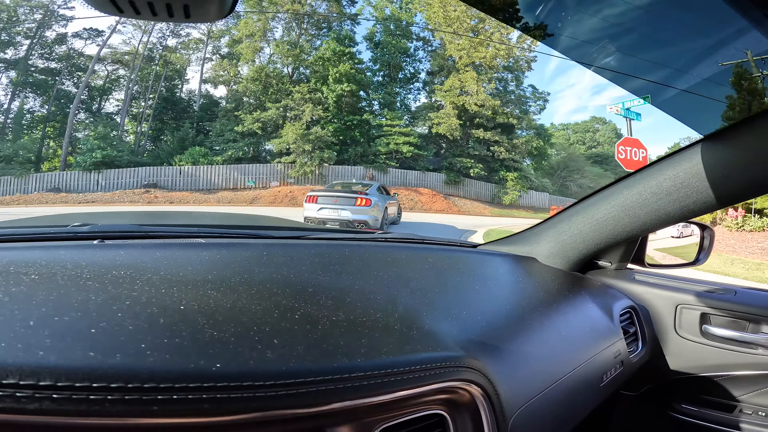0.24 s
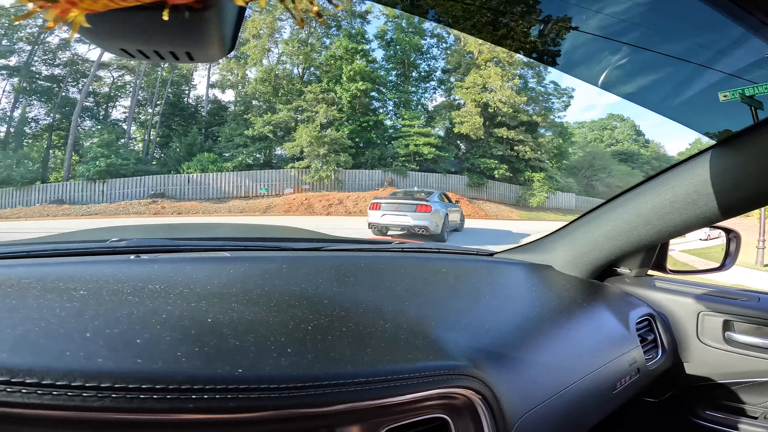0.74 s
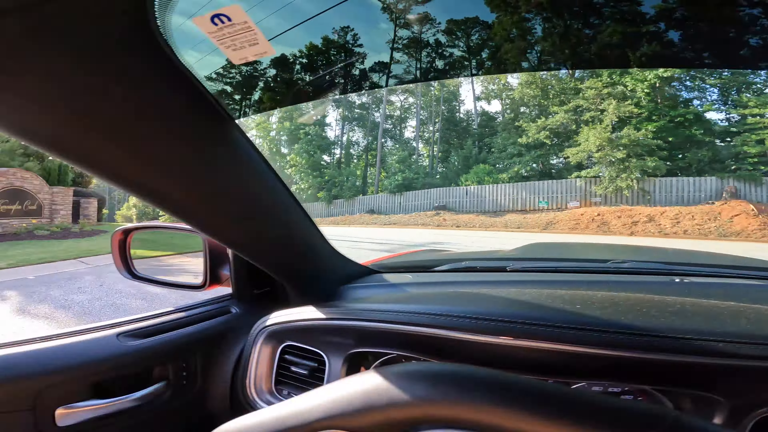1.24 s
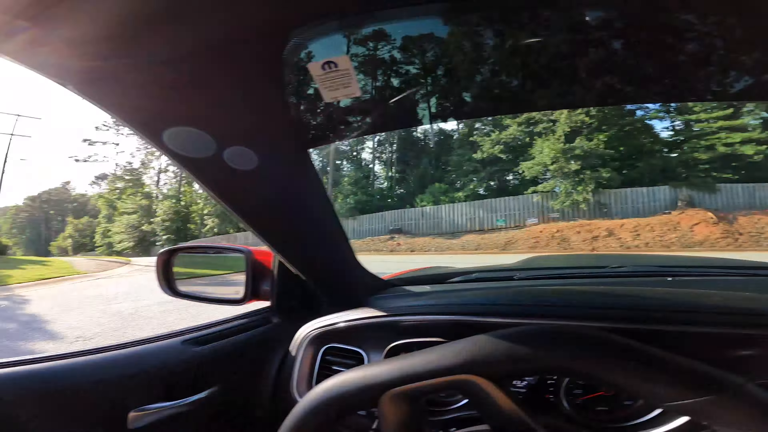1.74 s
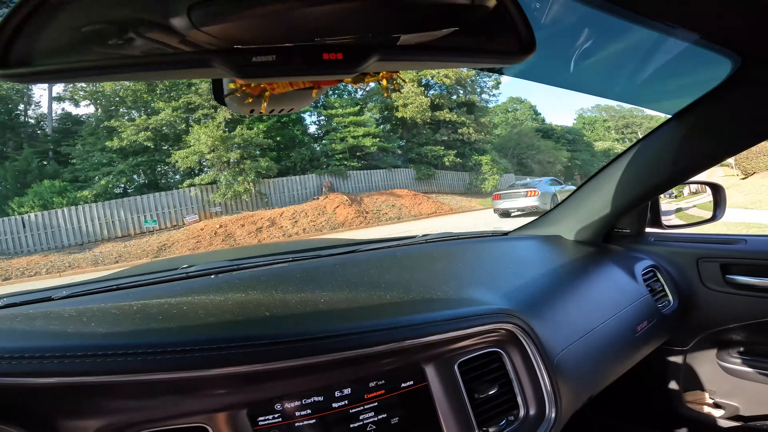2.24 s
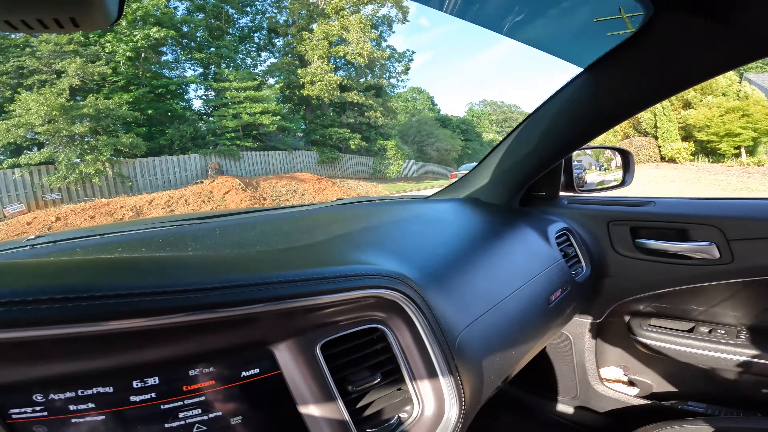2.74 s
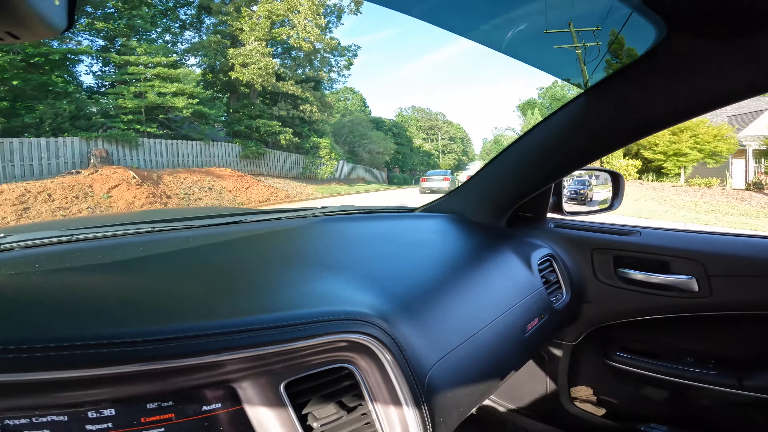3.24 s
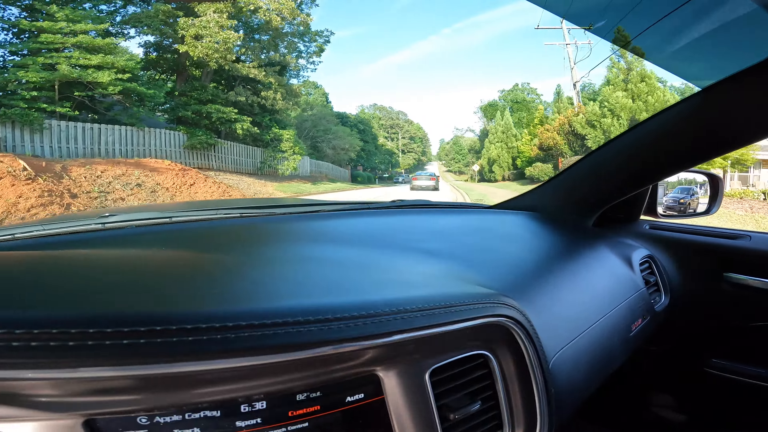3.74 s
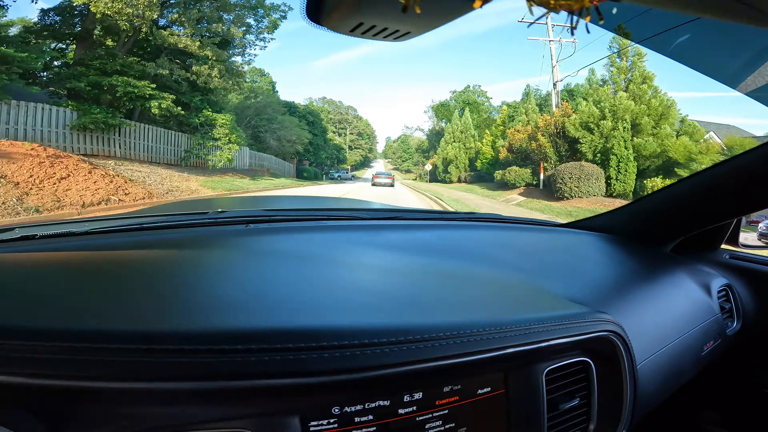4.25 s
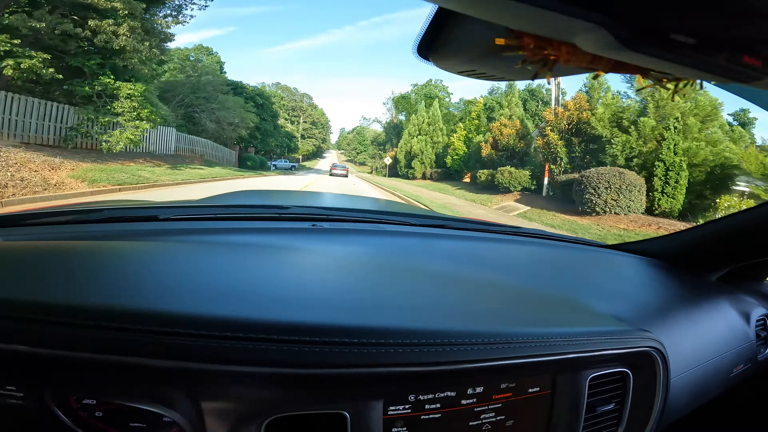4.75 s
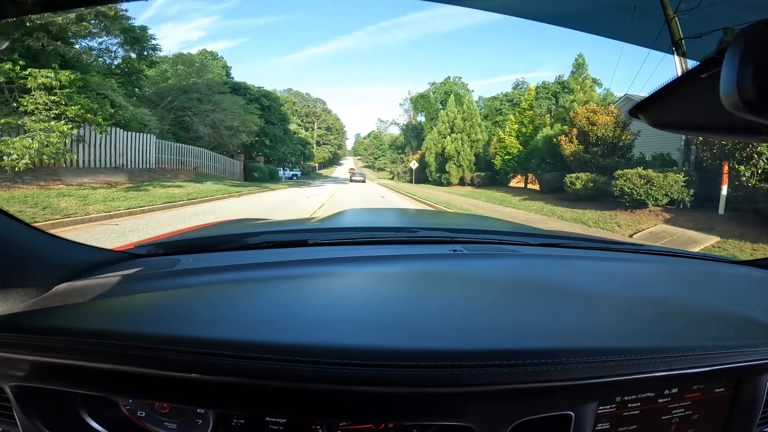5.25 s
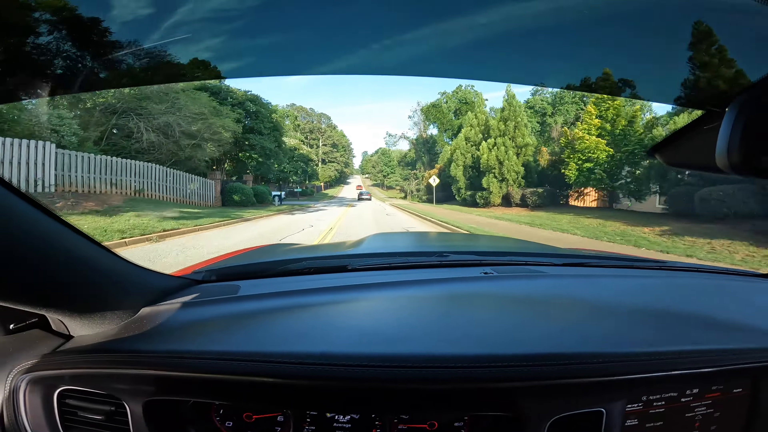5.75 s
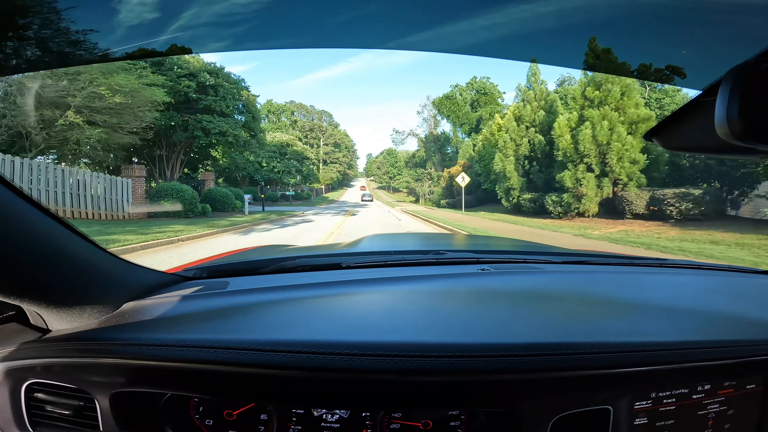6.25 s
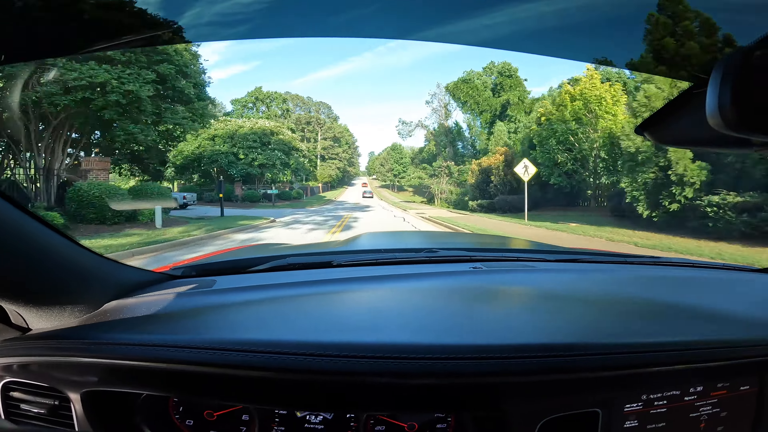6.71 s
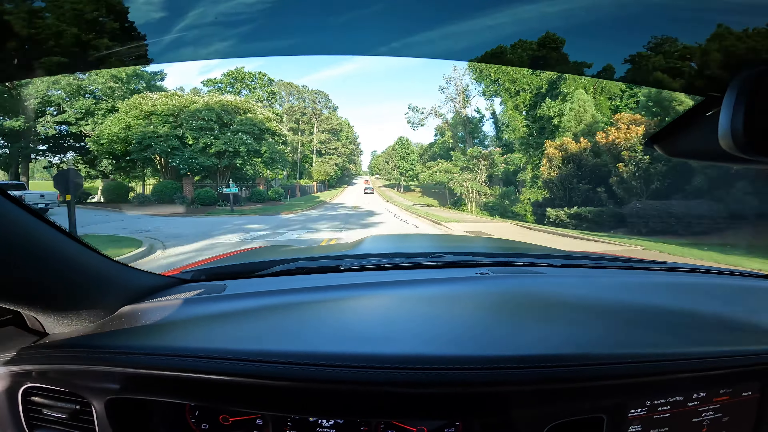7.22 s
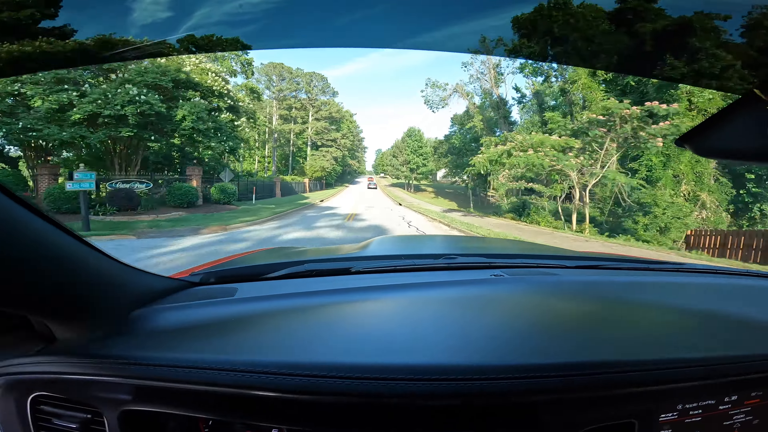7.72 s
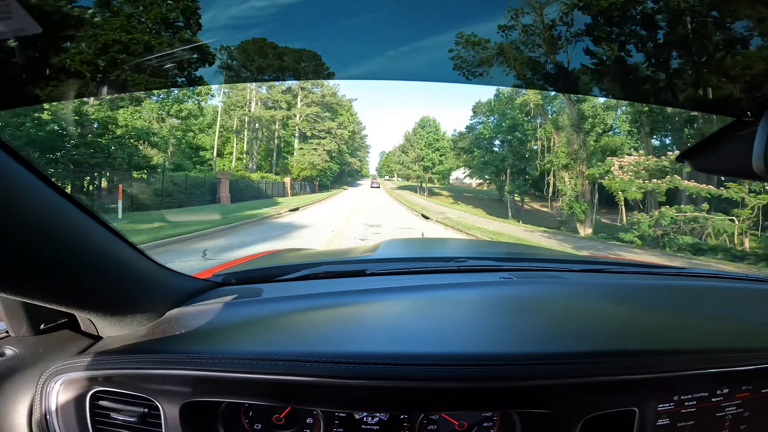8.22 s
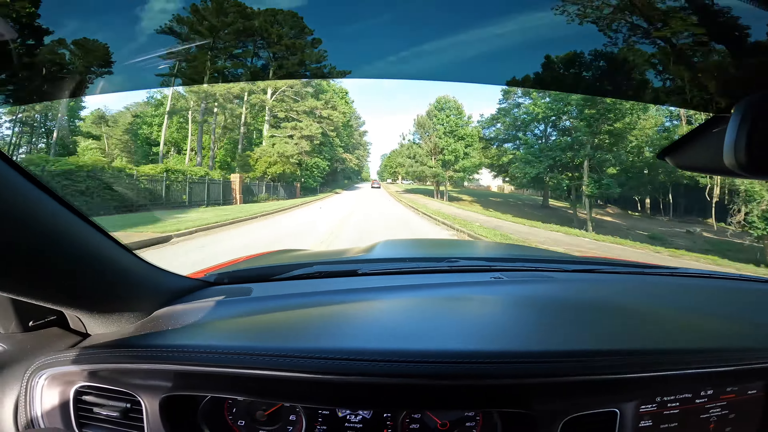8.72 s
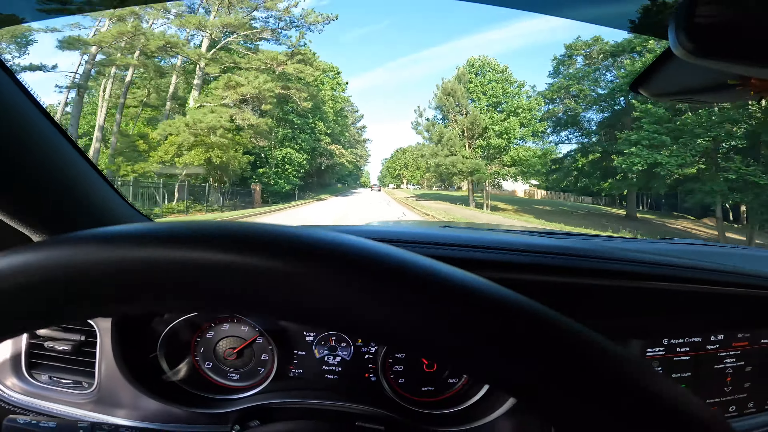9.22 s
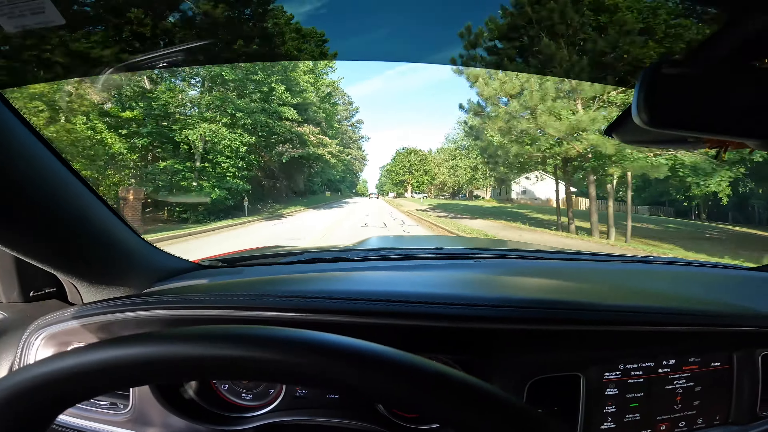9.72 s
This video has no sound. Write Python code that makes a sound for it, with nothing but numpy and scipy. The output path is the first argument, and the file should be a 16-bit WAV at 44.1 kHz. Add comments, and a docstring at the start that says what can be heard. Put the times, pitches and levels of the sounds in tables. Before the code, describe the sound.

A microphone carried about inside a moving car catches another V8 pulling away in front, its exhaust growling and snarling through gear changes, tyres chirping and howling. As it recedes, the near engine rises from a soft idle hum to a full-throttle roar with airy hiss, changes up twice, and relaxes over bumpy low road rumble.

```python
"""A V8 car ahead revs away with howling tyres, heard from inside a second V8 car that follows it. The near
engine then pulls from low revs, kicks down, shifts up twice and eases into a cruise. Firing pulses and puffs of
noise make the exhausts; wavering sines make the engine notes and booms. Shaped noise makes the road rumble, the
rushing air and a few gritty ticks; gliding tones make the tyres and one high engine whine of the car ahead."""
import sys
import numpy as np
from scipy import signal
from scipy.fft import rfft, irfft, next_fast_len
from scipy.io import wavfile
from scipy.ndimage import uniform_filter1d

SR = 44100
rng = np.random.default_rng(int(sys.argv[2]) if len(sys.argv) > 2 else 0)


def waveform_to_disk(signal):
    """Save audio, clipped to [-1, 1], as 16-bit WAV at the path in sys.argv[1]."""
    frames = np.transpose(np.atleast_2d(signal))
    scaled = np.clip(frames, -1, 1) * 32767
    samples = np.round(scaled).astype(np.int16)
    wavfile.write(sys.argv[1], SR, samples)


N = 439677


def from_db(db):
    """Turns decibels into a gain."""
    return 10 ** (np.asarray(db) / 20)


def rms_one(x):
    """Scales x to an average strength (rms) of 1."""
    return x / np.sqrt(np.mean(x ** 2) + 1e-20)


def follow(rows, control):
    """Reads each column of a table at the control's value, with straight lines between rows."""
    x, *columns = np.transpose(rows)
    return [np.interp(control, x, column) for column in columns]


def in_time(rows):
    """Turns a table whose first column is time into one curve per remaining column."""
    return follow(rows, np.arange(N) / SR)


def sounding(rows, fade_s):
    """Is 1 during a table's time span and fades to 0 outside it."""
    t = np.arange(N) / SR
    inside_s = np.minimum(t - rows[0][0], rows[-1][0] - t)
    return np.clip(1 + inside_s / fade_s, 0, 1)


def swell(start, end, attack_s, release_s):
    """Rises smoothly, holds and falls: 0-1, half-way up at start and half-way down at end."""
    t = np.arange(N) / SR
    rise = .5 + .5 * np.tanh(2 * (t - start) / attack_s)
    fall = .5 + .5 * np.tanh(2 * (end - t) / release_s)
    return rise * fall


def swells(rows, fade_s):
    """Sums events (start, end, values..) into one curve per value."""
    return sum(np.outer(values, swell(start, end, fade_s, fade_s)) for start, end, *values in rows)


def drift(rate):
    """Wanders smoothly at random with spread 1; a higher rate wanders faster."""
    step = 40  # samples between the points of the slow curve
    r = np.exp(-2 * step * np.pi * rate / SR)
    raw = rng.standard_normal(N // step + 2002)
    slow = signal.lfilter([1], [1, -2 * r, r * r], raw)[2000:]  # drops the filter's start-up
    return np.interp(np.arange(N) / step, np.arange(len(slow)), rms_one(slow))


def noise():
    """Makes fresh white noise."""
    return rng.standard_normal(N)


def colour(x, spectrum):
    """Filters x to the drawn response, then scales it to rms 1."""
    hz, db = np.transpose(spectrum)
    size = next_fast_len(N + SR // 10)
    f = np.maximum(np.fft.rfftfreq(size, 1 / SR), 1)
    gain = from_db(np.interp(np.log(f), np.log(hz), db, left=-90, right=-90))
    return rms_one(irfft(rfft(x, size) * gain, size)[:N])


def even(x):
    """Holds the slow level near 1 and keeps the fast throb."""
    slow_power = np.abs(uniform_filter1d(x ** 2, SR // 8))
    return x / np.sqrt(slow_power + 1e-9)


# Road rumble as the car gathers speed: t/s, level/dB (before bumps and trim)
RUMBLE_LEVEL = [(0, -22.5), (3.9, -24.5), (4.6, -22.5), (9.97, -19)]
# Rough stretches of road: start t/s, end t/s, added level/dB
BUMPS = [(4.66, 4.9, 8), (5.4, 5.8, 6.5), (5.85, 6.14, 10), (6.48, 6.85, 9.5), (7.42, 8.2, 5),
         (8.85, 9.5, 8)]
# Tone of the rumble: f/Hz, relative level/dB
RUMBLE_SPECTRUM = [(11, -18.5), (20, 5), (29, 0), (42, -4), (62, -7.5), (85, -22), (130, -28), (250, -37)]
# Tone of the cabin's low resonances: f/Hz, relative level/dB
CABIN_DRONE = [(60, -12.5), (90, -5.5), (115, -1.5), (160, -3), (220, -7), (290, -8.5), (450, -25)]


def road():
    """Buffeting and tyre rumble are low noise, joined by noise at the cabin's own low resonances."""
    rumble_db = in_time(RUMBLE_LEVEL)[0] + swells(BUMPS, fade_s=0.15)[0] + 0.67 * drift(1.3)
    rumble = from_db(rumble_db - 5.5) * even(colour(noise(), RUMBLE_SPECTRUM))
    drone = from_db(-26.5 + 1.1 * drift(3.9)) * colour(noise(), CABIN_DRONE)
    return rumble + drone


# Gritty ticks: t/s, strength level/dB (before trim and colouring)
TICKS = [(0.3501, -30), (0.391, -30), (0.4674, -36), (0.5124, -37), (0.7743, -33), (2.1994, -48),
         (2.4144, -38), (2.4674, -39), (2.7514, -32), (2.7945, -36), (2.8214, -37), (2.8844, -35),
         (2.9894, -33), (3.0344, -38), (3.1058, -37)]


def grit(decay_s, level_db):
    """Each tick is a short, dying spray of tiny noise grains of uneven strength."""
    hits = np.zeros(N)
    for s, db in TICKS:
        hits[round(s * SR)] = from_db(db + level_db)
    spray = signal.lfilter([1], [1, -np.exp(-1 / (decay_s * SR))], hits + 1e-18)
    grains = noise() * from_db(4 * noise())
    # f/Hz, relative level/dB
    spectrum = [(2000, -7), (5500, 6.5), (8500, -6.5), (11300, -15), (13000, -12), (15500, -24)]
    return spray * colour(grains, spectrum)


def air(hiss_db, spectrum):
    """Rushing air is noise that flutters around the level an engine sets."""
    flutter_db = .8 * drift(40)
    return from_db(hiss_db - .5 + flutter_db) * colour(noise(), spectrum)


def cabin(x, wet):
    """Adds quick cabin reflections, whose mix shifts as the listening spot is carried about."""
    t60_s = 0.16  # time for reflections to die by 60 dB
    t = np.arange(SR // 20) / SR
    dying = from_db(-60 * t / t60_s)
    reflections = 0
    for _ in range(3):
        path = signal.oaconvolve(x, rng.standard_normal(len(t)) * dying)[:N]
        reflections = reflections + drift(1.48) * path
    return rms_one(x) + wet * rms_one(reflections)


# Engine speeds count four-stroke cycles (two crank turns); a V8 fires eight times a cycle.
# Engine order k is a tone at k times the cycles per second.
def crank(speed, flutter):
    """Counts the engine cycles turned so far, at a slightly unsteady speed."""
    return np.cumsum(speed * (1 + flutter * drift(9))) / SR


def boom(turns, orders, waver):
    """Low engine orders are sines locked to the turning engine; each wavers in strength."""
    total = 0
    for order, db in orders:
        strength = np.sqrt(2) * from_db(db) * (1 + waver * drift(20))
        total = total + strength * np.sin(2 * np.pi * (round(order) * turns + rng.random()))
    return total


def blare(turns, blares, waver):
    """Single engine orders swell as they meet a tailpipe resonance, then sink back."""
    fade_s = 0.14
    return sum(swell(start, end, fade_s, fade_s) * boom(turns, [(order, db)], waver)
               for start, end, order, db in blares)


# Cylinders in firing order: strength level/dB, lateness at the tailpipe/share of the firing gap
CYLINDERS = [(-2, -0.0048), (-6, 0.258), (-9, 0.051), (0, -0.129), (1, 0.2966), (-8, -0.046), (-7, 0.173),
             (-4.5, 0.346)]


def firings(turns, rough, jitter_s):
    """Each cylinder sends one pulse; the two banks arrive unevenly, which gives the V8 burble."""
    strength_db, late = np.transpose(CYLINDERS)
    count = np.arange(int(turns[-1] * len(late)) - 1)
    cylinder = count % len(late)
    at = np.interp((count + late[cylinder]) / len(late), turns, np.arange(N)).astype(int)
    time_luck, strength_luck = rng.standard_normal((N // 100, 2))[:len(at)].T
    # no two charges burn alike: the spread in timing blurs the highest orders
    at = np.clip(at + jitter_s * SR * time_luck, 0, N - 1).astype(int)
    pulses = np.zeros(N)
    pulses[at] = from_db(strength_db[cylinder]) * (1 + rough[at] * strength_luck)
    return pulses


# Tone of the treble rasp of both exhausts: f/Hz, relative level/dB
RASP = [(1500, -18.5), (2000, -6), (2500, -2), (3100, -3), (3900, -10.5), (5000, -16), (6000, -21.5),
        (7500, -44.5)]
# Share of gas noise in growl and bark, per unit of firing roughness
GAS_IN_GROWL, GAS_IN_BARK = 1.4, 2.3


def exhaust(turns, levels_db, rough, growl, bark, gas_rasp):
    """Each firing is a pressure pulse and a dying puff of gas noise, which takes over towards the treble."""
    growl_db, bark_db, rasp_db = levels_db
    puff_s = 0.038
    pulses = firings(turns, rough, jitter_s=.00008)
    puff = signal.lfilter([1], [1, -np.exp(-1 / (puff_s * SR))], np.abs(pulses))
    tone = even(cabin(pulses, wet=2.06))
    gas = even(puff * noise())
    layers = [
        (growl, growl_db - .8, GAS_IN_GROWL * rough),
        (bark, bark_db - .3, GAS_IN_BARK * rough),
        (RASP, rasp_db, gas_rasp),
    ]
    return sum(from_db(db) * even(colour(tone + gas_share * gas, spectrum))
               for spectrum, db, gas_share in layers)


# Howls of the car ahead's tyres, plus one high engine order of that car (the glide from 0.921 s): start t/s,
# end t/s, start f/Hz, end f/Hz, level/dB (before trim)
HOWLS = [(0.662, 0.897, 827, 860, -25.5), (0.667, 0.853, 690, 643, -25), (0.921, 1.555, 950, 1124, -34),
         (1.815, 2.301, 659, 602, -28), (2.05, 2.707, 551.5, 537, -25), (2.119, 2.716, 584, 600, -24),
         (2.45, 2.94, 790, 810, -28), (2.096, 2.65, 1273, 1285, -36), (2.121, 2.853, 1428, 1400, -36),
         (2.622, 2.946, 1600, 1640, -33), (3.081, 3.48, 1600, 1574, -32.5),
         (2.95, 3.348, 1165, 1203, -32.5), (3.049, 3.554, 1370, 1424, -33)]


def tyres(wander, flicker_db):
    """Tread sticks and slips: each howl is an unsteady gliding tone that swells and dies. The glide from 0.921
    s is a high order of the engine ahead, played the same way."""
    t, out = np.arange(N) / SR, np.zeros(N)
    for start, end, start_hz, end_hz, db in HOWLS:
        on = (t > start) & (t < end)
        progress = (t[on] - start) / (end - start)
        glide_hz = start_hz + (end_hz - start_hz) * progress
        hz = glide_hz * (1 + wander * drift(55)[on])
        strength = np.sqrt(np.sin(np.pi * progress)) * from_db(db + flicker_db * drift(34)[on])
        out[on] += strength * np.sin(2 * np.pi * np.cumsum(hz) / SR)
    return out


# Surges of the car ahead: start t/s, end t/s, strength level/dB, brightness/dB per octave
SURGES = [(-.1, 0.26, -4.5, 1), (0.263, .5, -0.6, 0), (.52, 0.685, -5, 0), (0.702, 0.884, 1, 0.5),
          (0.917, 1.256, -7, 0.5), (1.223, 1.422, -3.5, .5), (1.404, 1.712, 0, 1), (1.78, 2.15, -3.5, -4),
          (2.145, 2.68, 1.2, -7), (2.42, 2.518, -8, 1.5), (2.69, 2.823, 4.5, -2.3), (2.86, 4.13, 1.8, -1.6),
          (4.134, 4.66, -0.5, -0.2), (4.647, 5.1, -6.5, -0.5)]
# Growl, bark, rasp and hiss of a surge: base level/dB, pitch region/octaves above 1 kHz
SURGE_VOICES = [(-23.5, -0.5), (-27, 0), (-35.5, 1.5), (-49.5, 2)]


def surges():
    """Gives the growl, bark, rasp and hiss levels in dB as surges swell, each with its own brightness."""
    shapes = [(swell(start, end, attack_s=0.061, release_s=0.15), db, tilt_db)
              for start, end, db, tilt_db in SURGES]
    levels_db = []
    for voice_db, octaves in SURGE_VOICES:
        power = sum(shape * from_db(db + tilt_db * octaves) ** 2 for shape, db, tilt_db in shapes)
        levels_db.append(voice_db + 10 * np.log10(1e-9 + power))
    return levels_db


# Engine of the car ahead, through two upshifts: t/s, speed/cycles per s
LEAD_SPEED = [(0, 20.1), (.5, 24.3), (.7, 24.7), (.92, 17.7), (1.1, 20.2), (1.5, 22.9), (2.0, 25.8),
              (2.75, 28.9), (2.92, 25.95), (3.22, 37.3), (3.52, 42.8), (3.78, 44.9), (4.05, 50.5),
              (4.3, 53.5), (4.46, 54.1), (4.68, 40.6), (4.9, 42.7)]
# How hard it is heard to pull: t/s, level/dB
LEAD_EFFORT = [(0, -26.5), (.45, -26.5), (.9, -23), (1.4, -21.5), (1.9, -24.5), (2.5, -26.5), (3, -27),
               (3.4, -24), (3.8, -23), (4.4, -23.5), (4.58, -26.5), (4.9, -23)]
# Its firing note in the cabin: f/Hz, level/dB against its effort
LEAD_BOOM = [(140, 1), (162, -1.5), (184, 6.5), (208, -0.1), (250, 3.7), (316, -10), (355, 3), (430, -18)]
# Its weaker engine orders: order, level/dB against its effort
LEAD_ORDERS = [(4, -12.5), (5, -16.5), (6, -5.5), (7, -10), (9, -15.5), (10, -8.5), (11, -14.5), (12, -17),
               (18, -15), (19, -21.5), (24, -22)]
# Its growl thins out at high revs: speed/cycles per s, added level/dB
LEAD_GROWL_BY_SPEED = [(41, 0.5), (47, -5.5)]
# Tone of its growl: f/Hz, relative level/dB
LEAD_GROWL = [(230, -41), (300, -16), (360, -5.5), (410, -8), (455, -0.5), (580, -2.5), (700, -5.5),
              (850, -23)]
# Tone of its bark: f/Hz, relative level/dB
LEAD_BARK = [(580, -41), (730, -4.5), (820, 3), (930, 1.5), (1050, 0.5), (1220, -2), (1450, -5), (1700, -9),
             (2000, -10.5), (2600, -30.5)]
# Tone of its hiss: f/Hz, relative level/dB
LEAD_HISS = [(4800, -2), (6000, -1.5), (8000, -8), (10000, -18.5), (11300, -24.5), (12600, -17),
             (14000, -33), (15500, -37)]
# Its tailpipe blares: start t/s, end t/s, engine order, level/dB
LEAD_BLARES = [(.27, 0.44, 16, -24), (0.22, 0.43, 24, -24.5), (0.19, 0.45, 32, -30), (0.56, 1, 32, -32.5),
               (1.2, 1.56, 16, -28.5), (1, 1.64, 13, -30), (2.1, 2.89, 16, -25), (2.67, 3.1, 13, -27.5),
               (2.3, 4, 24, -38.5), (4.1, 4.55, 18, -30.5), (4.12, 4.5, 19, -32.5), (4.28, 4.5, 23, -36),
               (4.15, 4.45, 32, -40)]


def car_ahead(share):
    """Its tailpipes point back at the cabin: a firing note, burble, blares, exhaust pulses and hiss."""
    speed, = in_time(LEAD_SPEED)
    effort_db, = in_time(LEAD_EFFORT)
    turns = crank(speed, flutter=.003)
    note_db = effort_db + follow(LEAD_BOOM, 8 * speed)[0]
    note = boom(turns, [(8, note_db)], waver=0.25)
    burble = from_db(effort_db) * boom(turns, LEAD_ORDERS, waver=0.29)
    tones = sounding(LEAD_SPEED, fade_s=0.19) * (note + burble) + blare(turns, LEAD_BLARES, waver=.25)

    growl_db, bark_db, rasp_db, hiss_db = surges()
    growl_db = growl_db + follow(LEAD_GROWL_BY_SPEED, speed)[0]
    rough = np.full(N, 0.22)  # spread of the firing strengths
    pipes = exhaust(turns, (growl_db, bark_db, rasp_db), rough, LEAD_GROWL, LEAD_BARK, gas_rasp=2.0)
    return tones + np.sqrt(share) * (from_db(-2.5) * pipes + air(hiss_db, LEAD_HISS))


# Near engine rolling off idle: t/s, speed/cycles per s
IDLE_SPEED = [(0, 7.63), (.15, 7.74), (.3, 6.6), (.9, 7.72), (1.2, 7.5), (1.5, 6.28), (1.7, 6.61),
              (1.9, 7.94), (2.2, 9.04), (2.58, 9.45)]
# Near engine pulling, kicking down, shifting up twice and cruising: t/s, speed/cycles per s
NEAR_SPEED = [(2.65, 11.35), (2.8, 13.55), (3.0, 15.35), (3.45, 14.15), (3.8, 15.9), (4.35, 19.15),
              (4.65, 22.4), (4.87, 26.8), (5.17, 39.1), (5.5, 42.2), (6.02, 51.2), (6.22, 39.3),
              (6.42, 43.4), (6.6, 44.25), (6.86, 41.7), (7.3, 47.2), (7.74, 52.1), (7.93, 38.6),
              (8.06, 36.2), (8.6, 39.9), (9.2, 39.5), (9.97, 37.6)]
# The near driver's foot: t/s, throttle/0-1
THROTTLE = [(0, 0.09), (2.6, 0.16), (2.9, .35), (4.5, 0.3), (4.9, 0.32), (5.25, 0.98), (6.95, 0.93),
            (7.2, .82), (7.5, 0.95), (7.98, 1), (8.08, 0.56), (8.76, 0.58), (8.9, 0.01), (9.38, 0.07),
            (9.47, 0.3), (9.58, 0.14), (9.97, 0)]
# What the throttle does, levels before flares and trims: throttle/0-1, growl level/dB, bark level/dB,
# rasp level/dB, hiss level/dB, second order added level/dB, weaker orders added level/dB,
# spread of firing strengths/share
BY_THROTTLE = [(0, -30.5, -38.5, -56, -74, -4.5, -7, 0.63), (.5, -22.5, -28.5, -44, -57.5, 1, -.5, 0.3),
               (1, -21.5, -24.5, -34, -46.5, 5.5, 0, 0.31)]
# Gear changes: start t/s, end t/s, flare of bark, rasp and hiss level/dB, flare of growl level/dB,
# added spread of firing strengths/share
SHIFTS = [(4.93, 5.15, 1.5, 3, 0.23), (6.06, 6.2, 2.5, 2, .05), (7.78, 7.92, 1.5, -2, .25)]
# Cabin resonances met by the second engine order: f/Hz, level/dB (before load and trim)
SECOND_BOOM = [(26, -43), (42, -24.5), (72, -36), (84, -28), (100, -27.5)]
# Cabin resonances met by the third order: f/Hz, level/dB (before trim)
THIRD_BOOM = [(50, -38), (80, -26), (112, -23.5), (120, -28), (134, -28), (142, -32), (152, -26)]
# Cabin resonances met by the fifth order: f/Hz, level/dB (before trim)
FIFTH_BOOM = [(60, -41), (100, -38.5), (125, -21.5), (150, -24), (175, -13.5), (198, -14.5), (255, -17.5)]
# Cabin resonances met by the firing note, order eight: f/Hz, level/dB (before trim)
FIRING_BOOM = [(90, -24.5), (112, -17.5), (122, -14), (136, -15), (147, -19.5), (180, -13.5), (215, -24),
               (325, -36.5), (365, -26.5), (415, -27)]
# Weaker engine orders: order, level/dB against order five (before throttle and trim)
NEAR_ORDERS = [(1, -12.5), (4, -11.5), (6, -17), (7, -21.5), (9, -14.5), (10, -34), (11, -28.5), (12, -27),
               (13, -33), (14, -23.5), (16, -28)]
# Tone of the near growl: f/Hz, relative level/dB
NEAR_GROWL = [(230, -29), (300, -5.5), (360, 3), (440, -0.5), (520, -4), (620, 0.5), (720, -2.5),
              (850, -24.5)]
# Tone of the near bark: f/Hz, relative level/dB
NEAR_BARK = [(580, -29), (730, -3.5), (820, 1), (920, 3), (1050, -0.5), (1250, -3), (1450, -2.5),
             (1700, -9), (2000, -10.5), (2600, -29)]
# Tone of the near hiss: f/Hz, relative level/dB
NEAR_HISS = [(4800, -28), (6000, 0), (8000, 1), (10000, -9.5), (11300, -14.5), (12100, -5), (12800, 1),
             (14000, -11.5), (15000, -19.5), (15700, -22.5)]
# Near tailpipe blares: start t/s, end t/s, engine order, level/dB
NEAR_BLARES = [(4.88, 5.1, 4, -15.5), (5.44, 5.85, 3, -17), (5.05, 5.197, 16, -24.5), (5.27, 5.55, 18, -29),
               (7.247, 7.714, 9, -33), (8.1, 8.75, 16, -32.5), (8.103, 8.7, 8, -27.5)]


def near_engine(share):
    """It hums at idle, then its orders boom at cabin resonances; the throttle opens the exhaust."""
    speed, = in_time(list(IDLE_SPEED) + list(NEAR_SPEED))
    throttle, = in_time(THROTTLE)
    turns = crank(speed, flutter=.002)
    growl_db, bark_db, rasp_db, hiss_db, load_db, weak_db, rough = follow(BY_THROTTLE, throttle)
    flare_db, growl_flare_db, stumble = swells(SHIFTS, fade_s=0.058)

    hum_db = -22 + 1 * (speed - 7)  # -22 dB at 7 cycles per s, 1 dB more for each further cycle per s
    hum = boom(turns, [(16, hum_db)], waver=0.3)

    second_db, = follow(SECOND_BOOM, 2 * speed)
    third_db, = follow(THIRD_BOOM, 3 * speed)
    fifth_db, = follow(FIFTH_BOOM, 5 * speed)
    firing_db, = follow(FIRING_BOOM, 8 * speed)
    drone = boom(turns, [(5, fifth_db), (8, firing_db)], waver=.08)
    weaker = [(order, fifth_db + weak_db + db) for order, db in NEAR_ORDERS]
    throb = boom(turns, [(2, second_db + load_db), (3, third_db)] + weaker, waver=0.16)
    pulling = from_db(0.2) * drone + from_db(1.26) * throb
    low = sounding(IDLE_SPEED, fade_s=0.085) * hum + sounding(NEAR_SPEED, fade_s=0.071) * pulling

    levels_db = (growl_db + growl_flare_db, bark_db + flare_db, rasp_db + flare_db)
    pipes = exhaust(turns, levels_db, rough + stumble, NEAR_GROWL, NEAR_BARK, gas_rasp=1.4)
    rush = air(hiss_db + flare_db, NEAR_HISS)
    return low + blare(turns, NEAR_BLARES, waver=0.11) + np.sqrt(1 - share) * (from_db(0.43) * pipes + rush)


# The car ahead draws away: t/s, its share of the exhaust power/0-1
LEAD_SHARE = [(0, 0.95), (2.7, 0.78), (4.4, 0.88), (4.8, 0.77), (5.1, 0.4)]
# The level dips briefly: start t/s, end t/s, level/dB at full depth of the swell
DIPS = [(9.915, 9.925, -19)]


def scene():
    """Adds up the road, the grit and both cars, as heard in the cabin."""
    share = np.clip(in_time(LEAD_SHARE)[0], 0, 1)
    background = road() + grit(decay_s=0.027, level_db=-9)
    ahead = car_ahead(share) + from_db(1.0) * tyres(wander=0.02, flicker_db=3.0)
    dip = from_db(swells(DIPS, fade_s=.01)[0])
    return (background + ahead + near_engine(share)) * dip


def record(dry):
    """Rounds the peaks softly, then cuts the top of the treble steeply."""
    top, cutoff_hz = .85, 15650
    rounded = dry / (1 + (dry / top) ** 6) ** (1 / 6)
    lowpass = signal.ellip(10, .1, 80, cutoff_hz, fs=SR, output="sos")
    return signal.sosfilt(lowpass, rounded)


dry = scene()
out = record(dry)
waveform_to_disk(out)
```